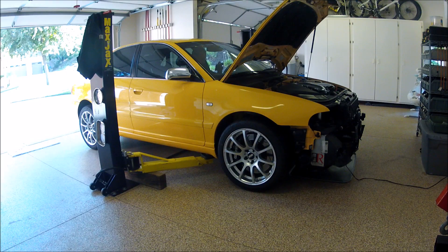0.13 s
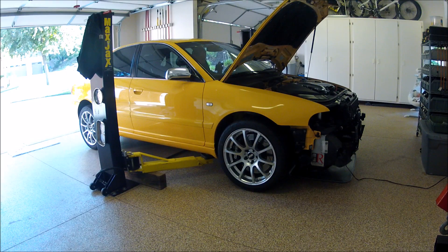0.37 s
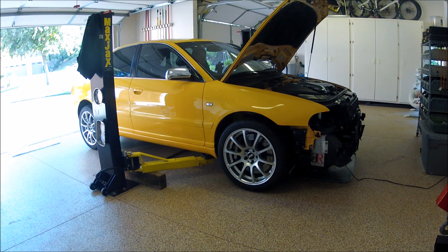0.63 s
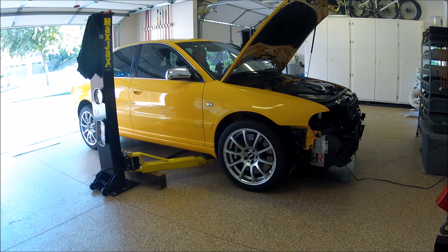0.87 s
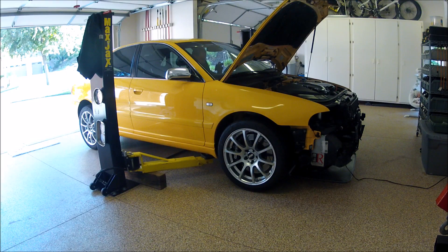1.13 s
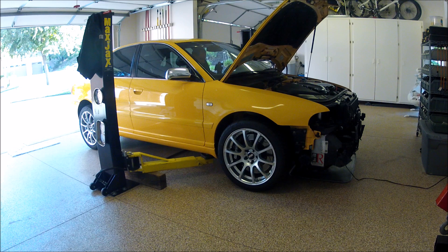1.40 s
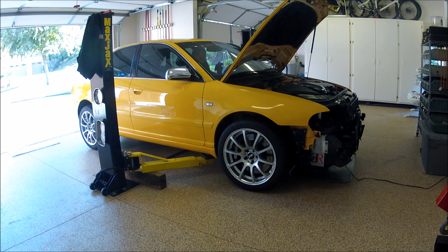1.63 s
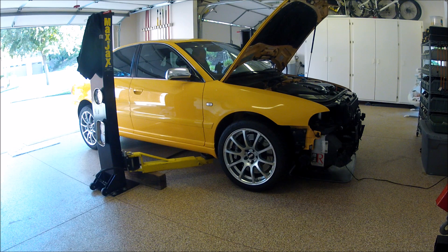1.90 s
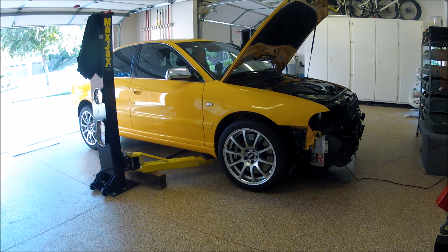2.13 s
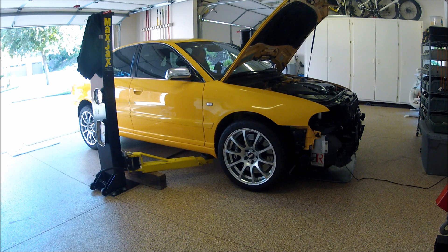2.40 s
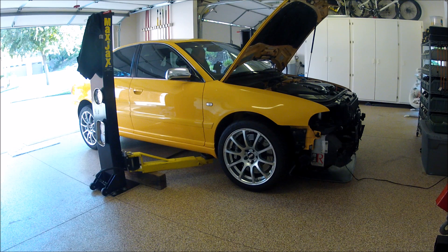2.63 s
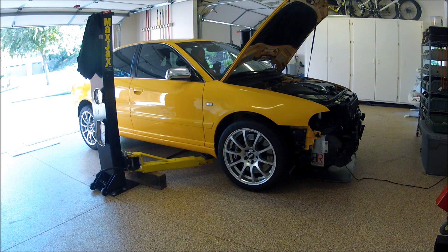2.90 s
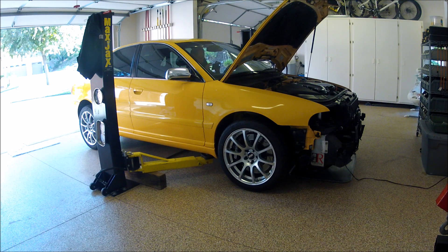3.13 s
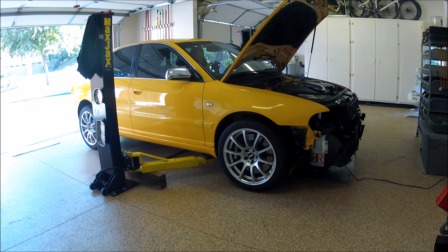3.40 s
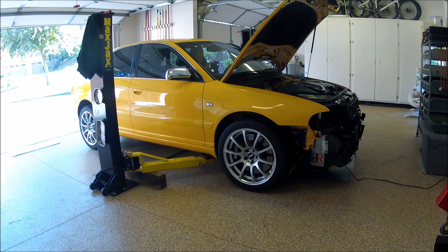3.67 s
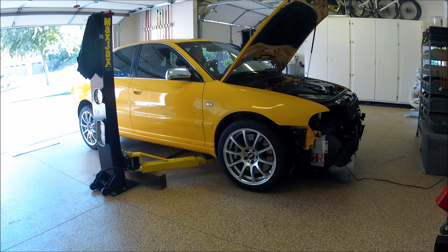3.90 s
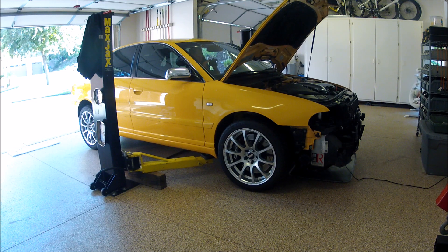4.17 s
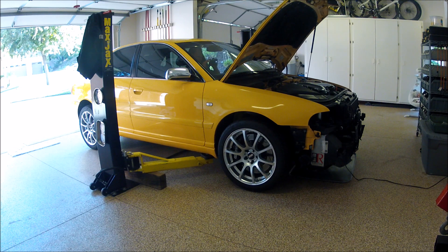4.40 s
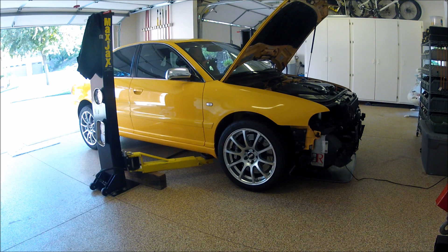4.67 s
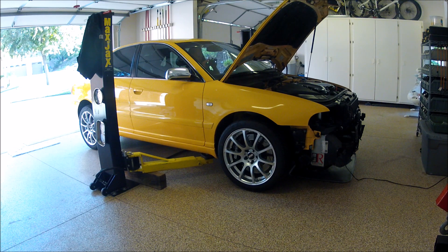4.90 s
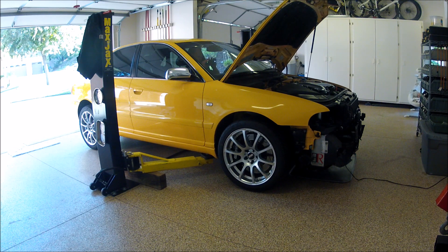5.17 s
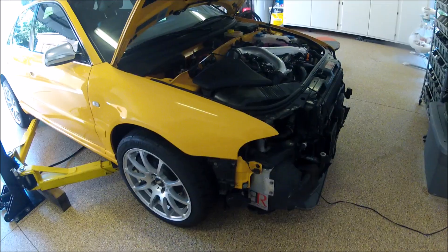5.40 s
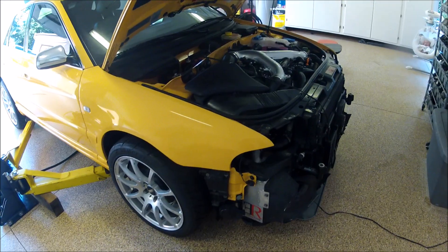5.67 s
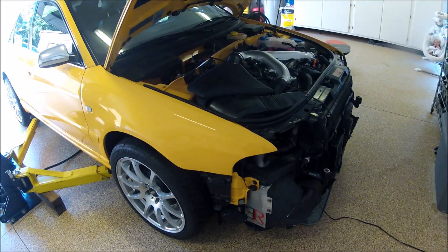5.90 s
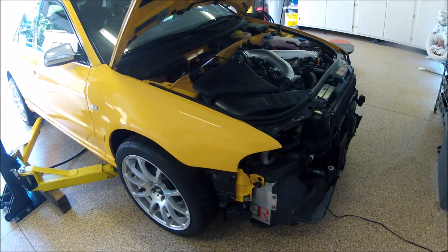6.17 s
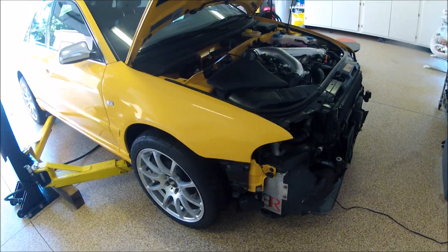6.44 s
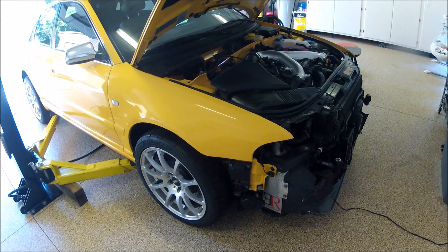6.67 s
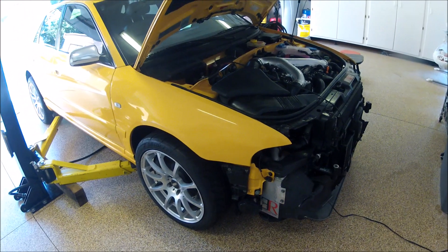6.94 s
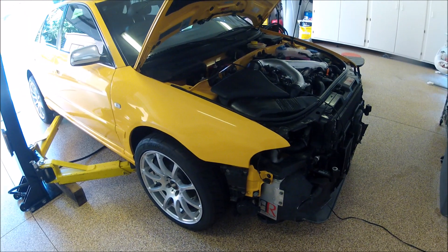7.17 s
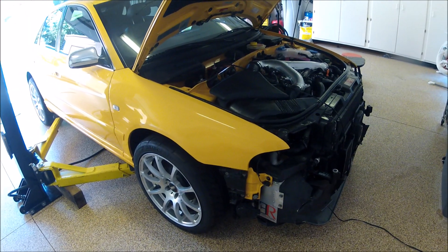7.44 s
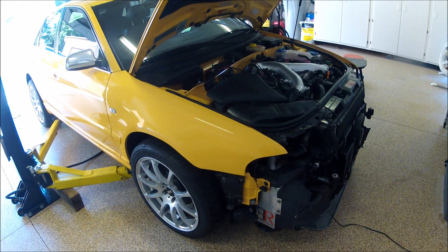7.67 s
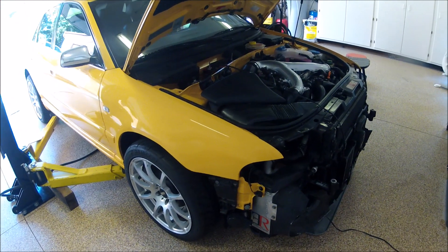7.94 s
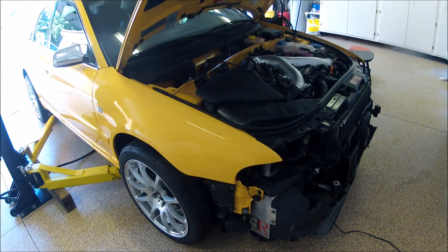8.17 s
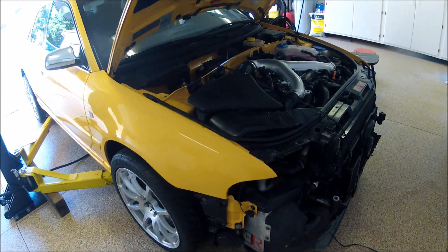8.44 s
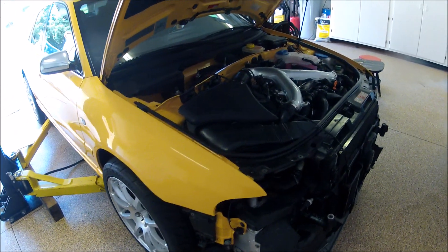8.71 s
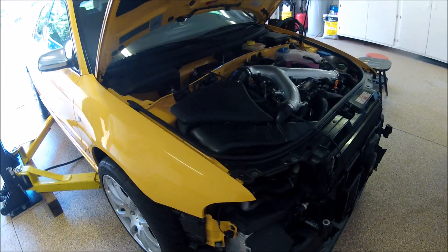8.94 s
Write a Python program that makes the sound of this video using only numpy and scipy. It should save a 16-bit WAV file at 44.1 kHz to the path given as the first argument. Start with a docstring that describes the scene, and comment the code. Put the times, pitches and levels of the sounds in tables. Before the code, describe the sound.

In a garage, a starter motor whines and grinds in heaves for half a second. The six-cylinder engine catches with uneven low pops, races with a droning, booming exhaust, then sinks to a steady fast idle. At about five and a half seconds the sound cuts hard to a close microphone by the open engine bay: a slower lumpy idle with valve ticking and airy mechanical rush.

```python
"""A six-cylinder car engine in a garage catches, races at a cold fast idle and sinks back; a starter cranks it.
At CUT_S the microphone jumps to the open engine bay, where the warm engine lopes at a slow idle.
Exhaust puffs ring pipe modes, knocks ring the block, shaped noise makes the rush and the valve ticks.
The starter is noisy gear teeth through moving resonances; faint whistles and hums stand by the bay."""
import sys
import numpy as np
from scipy import signal
from scipy.fft import rfft, irfft
from scipy.io import wavfile
from scipy.ndimage import uniform_filter1d

SR = 44100
rng = np.random.default_rng(int(sys.argv[2]) if len(sys.argv) > 2 else 0)


def unload_wav(signal):
    """Save mono or channel-first audio to the path in sys.argv[1] as 16-bit WAV at rate SR, clipped to [-1, 1]."""
    wavfile.write(
        sys.argv[1],
        SR,
        np.round(np.clip(np.atleast_2d(signal).T, -1, 1) * 32767).astype(np.int16),
    )


def ratio_of_db(decibels):
    """Turn decibels (scalar or array-like) into linear amplitude factors; 0 dB maps to 1."""
    return 10 ** (np.asarray(decibels, float) / 20)


N = 399987
T = np.arange(N) / SR  # time in s
CUT_S, SPLICE_S = 5.4435, .0002  # the jump to the bay and the length of its crossfade

# Firing rate while catching and racing: time_s, rate_firings_per_s
RACING_RATE = [(.53, 32), (.6, 48), (.7, 68), (.8, 74), (.9, 66), (1, 68), (1.1, 76.7), (1.25, 78.69),
               (1.55, 78.22), (1.7, 76), (1.85, 78.62), (2, 76.67), (2.15, 73.74)]
# Exhaust level of the cold engine: time_s, level_db
COLD_EXHAUST = [(.53, -33), (.6, -13), (1.05, -13.5), (1.6, -11), (1.95, -11.5), (2.14, -7), (2.6, -12),
                (3.5, -16.5), (5.44, -17)]
# Way from the racing to the settled firing pattern: time_s, share_0_to_1
SETTLING = [(2.0, 0.097), (2.6, 0.56), (3.6, 0.84)]
# Weak burns while the engine catches: time_s, half_length_s, exhaust_change_db
MISFIRES = [(0.68, 0.034, -6), (0.83, 0.017, -6), (0.905, 0.014, -1), (0.973, 0.033, -8.5),
            (1.196, .04, -2)]
# Throttle movement: time_s, opening_0_to_1
THROTTLE = [(.53, 0.54), (.78, 0.65), (.9, 0.86), (1.05, 0.59), (1.25, 0.97), (1.95, 0.94), (2.35, 0.37),
            (3, 0)]
# Firing patterns, one row a cylinder in firing order: puff_db, lateness_firing_gaps
RACING_PUFFS = [(2, 0.19), (2, .16), (-4, 0.22), (2.5, 0.14), (-1.5, 0.17), (2, 0.15)]
SETTLED_PUFFS = [(0.7, 0.348), (-0.5, 0.414), (1.7, 0.356), (-2, 0.5), (5, 0.395), (-0.1, 0.379)]
LOPING_PUFFS = [(1.199, -0.01), (3.702, -0.059), (6.0, -0.041), (5.998, -0.037), (3.3, -0.015),
                (5.5, -0.018)]
# Exhaust pipe modes: pitch_hz, width_hz, odd_bank_signed_share, even_bank_signed_share
PIPE_FAR = [(63.2, 6.1, 0.36, 0.23), (126.6, 7.24, -1.32, -1.015), (177.8, 39.6, 0.64, 0.55),
            (200.4, 14.5, -0.58, -0.8), (233, 4.9, 0.14, 0.31), (308, 22, -0.033, -0.043),
            (391.8, 8.9, 0.022, 0.066), (461, 35, -0.03, -0.0038), (628, 52, 0.0098, -0.0012)]
PIPE_NEAR = [(57, 46, -0.031, -0.0011), (140.4, 17.3, 0.85, 0.92), (146.7, 41.8, -0.645, -0.775),
             (160.8, 77.7, 0.226, 0.303), (207.2, 24, -0.09, -0.152), (242.8, 10.2, -0.031, -0.11),
             (286.3, 6.2, 0.011, -0.021), (368.3, 12, -0.0184, -.012), (437, 15, 0.0065, .002)]
# Single heavy firings at the catch: start_s, size_db (before the swell), pitch_hz
POPS = [(.535, -3.5, 138), (.552, 2.5, 135), (0.609, 2, 155), (0.644, 4.5, 149), (0.691, -7, 145),
        (0.847, -1.5, 143), (0.924, -0.5, 149), (1.004, 1, 146.3), (1.249, -8, 161), (1.304, -5, 152)]
# Spectra of the belt, fan and intake rush: frequency_hz, relative_level_db (per Hz)
RUSH_RACING = [(260, -31), (440, -8.5), (566, -4), (1180, -13), (1660, -13), (5830, -25), (6660, -25),
               (13100, -43), (13900, -47), (15000, -96.5)]
RUSH_SETTLED = [(260, -39.5), (440, -8), (675, -3), (794, -18), (894, -10), (5920, -25), (6960, -27.5),
                (12000, -41.5), (12800, -38.5), (14100, -79), (15000, -80)]
RUSH_NEAR = [(270, -35), (460, -5), (653, -2), (836, -10), (1000, -2.5), (1370, -8), (2400, -9),
             (3500, -12.5), (4400, -16), (5730, -20.5), (7340, -22.5), (13500, -38.5), (14400, -44),
             (15000, -65)]
# Spectrum of the starter's grind: frequency_hz, relative_level_db (per Hz)
GRIND = [(53, -52), (90, -17.5), (532, -23.5), (567, -13), (733, -24), (1170, -16.5), (1840, -21.5),
         (2710, -21.5), (6650, -29), (13500, -53), (15000, -68)]
# Left-right likeness of the noise: frequency_hz, shared_power_0_to_1
SAME = [(300, .97), (630, .88), (1380, .62), (3030, .15), (6640, .03), (14600, .1)]
# Channel balance at either spot: frequency_hz, left_minus_right_db
LEFT_FAR = [(60, 0.31), (370, 0.0), (2330, 0.34), (14600, 1.4)]
LEFT_NEAR = [(60, 1.8), (370, 1.1), (2330, 2.5), (14600, 2.3)]
# Block and panels shaken by the valve gear: pitch_hz, width_hz, relative_level_db
BLOCK_FAR = [(230, 42, -1.5), (296.6, 36, -1), (339, 31, 1.5), (384.7, 22.6, -3), (446.4, 25, -13.5),
             (581, 80, -7.5), (681, 95, -9.5)]
BLOCK_NEAR = [(265, 47, 1), (349, 13, -3), (370.5, 27, -4), (436.4, 20, -5.5), (657, 50, -13)]
# Modes of a sheet cover: pitch_hz, width_hz, relative_level_db
COVER = [(916, 29, -4.5), (1190, 21, 2.5), (1250, 21, -7.5), (4480, 60, -13)]
# Compressions against the starter: time_s, body_shake_db, whine_dip_db
SQUEEZES = [(.045, -36, 0), (.218, -39, -11), (.36, -38, -5), (.505, -52, -5.5)]
# The motor pulls through after each compression: time_s, whine_drive_db
HEAVES = [(.09, -38.5), (.295, -36.5), (.445, -38.5), (.535, -43)]
# Groans of the starter housing: time_s, half_length_s, level_db, pitch_hz
GROANS = [(0.168, .04, -42, 255), (0.287, .025, -42, 310), (0.45, .025, -47, 317)]
# Clean orders under load: multiple_of_firing_rate, level_db (before the throttle sets the load)
GROWL = [(4, -41), (5, -35), (8, -41.5)]
# Faint steady whistles by the bay: pitch_hz, level_db
THIN_TONES = [(11972, -75), (13124, -80), (13517, -81)]
# Steady hums by the bay: pitch_hz, level_db
HUMS = [(441.4, -48.5), (909.8, -55)]

COLD_RATE, SINK_S = 63.537, .553  # cold idle in firings per s, time constant of the sink to it
WARM_RATE = 41.498  # warm idle, firings per s
HUNT_RATE, HUNT_S, HUNT_TOP_S = .236, 1.198, 6.607  # idle hunting: swing in firings per s, period, a crest
DROOP_S, DROOP_RATE = 8.596, 2.238  # from here the idle droops, firings per s per s
SHUT_DB, OPEN_DB = -45.5, -36.5  # machinery gain across the garage, throttle shut and open
WARM_EXHAUST_DB, WARM_RUSH_DB = -17, -40  # exhaust level and machinery gain by the bay
# Burn scatter (0-1) at the catch, later when cold, when warm; time constant of its dying away
SCATTER_FIRST, SCATTER_COLD, SCATTER_WARM, STEADY_S = .15, .02, .035, .6
LURCH_DB, LURCH_RISE_S, LURCH_HOLD_S, LURCH_DB_PER_S = -23.5, 0.017, 0.14, -180  # block rocking
GROWL_DB_PER_OPENING = 20.5  # the growl rises by this from shut to open throttle
CATCH_S, RELEASE_S = .53, 0.676  # the engine fires; the starter lets go
SHAKE_S, DIP_S, HEAVE_S = 0.026, 0.02, 0.026  # half lengths of body shake, whine dip, heave
SHAKE_FLOOR_DB = -53  # body shake between compressions
WHINE_DB, WHINE_OVERRUN_DB = -36, -29  # whine drive between heaves, change once the engine fires
WHINE_FIRST_HZ, WHINE_TOP_HZ, SPIN_UP_S = 1035, 1244, 0.16  # whine pitch and its rise time constant
SAG_HZ = 90  # pitch sag per 10 dB of whine dip
GRIND_DB, GRIND_DB_PER_S = -42.5, 4  # clatter gain at the start, its rise until the catch
HISS_START_S, HISS_DB, HISS_HZ = 0.4, -44.5, 5700  # a bright hiss rises as the engine takes over


def evened(x):
    """Levels a signal to rms 1."""
    return x / np.sqrt(np.mean(x ** 2) + 1e-20)


def read(points, hz):
    """Reads a curve on a log-frequency axis."""
    f, value = np.transpose(points)
    return np.interp(np.log(hz + 1), np.log(f + 1), value)


def curves(rows):
    """Draws every column of a timed table at the sample rate."""
    s, *columns = np.transpose(rows)
    return [np.interp(T, s, c) for c in columns]


def bump(s, half_s):
    """A bell in time, down to 1/e at half_s from its centre."""
    return np.exp(-((T - s) / half_s) ** 2)


def ring(hz, width, size=SR // 3):
    """One dying mode: a wider resonance starts louder and dies sooner."""
    t = T[:size]
    return width * np.exp(-np.pi * width * t) * np.sin(2 * np.pi * hz * t)


def struck(hits, body):
    """Lets every hit set off the body's ring."""
    return signal.oaconvolve(hits, body)[:N]


def resonate(x, hz, width):
    """A moving resonance: shift the curve hz to zero, smooth twice, shift back."""
    turn = np.exp(2j * np.pi * np.cumsum(hz) / SR)
    r = np.exp(-np.pi * width / SR)
    smooth = signal.lfilter([1], np.convolve([1, -r], [1, -r]), x / turn)
    return evened((turn * smooth).real)


def noise(first, second, share, patchy_db):
    """Patchy two-channel noise sliding between two spectra, each scaled by its 1.5 to 8 kHz power."""
    frames, hz = N // 128 + 5, np.fft.rfftfreq(512, 1 / SR)
    a, b, c, d, patches = rng.standard_normal((frames, 257, 5)).T
    patches = evened(uniform_filter1d(uniform_filter1d(patches, 6, 0), 14, 1))
    same = np.clip(read(SAME, hz), 0, 1)[:, None] ** .5
    left, other = a + 1j * b, c + 1j * d
    z = np.array([left, same * left + np.sqrt(1 - same ** 2) * other])
    band = (hz > 1500) & (hz < 8000)
    shapes = [ratio_of_db(read(p, hz)) / np.linalg.norm(ratio_of_db(read(p, hz[band]))) for p in (first, second)]
    share = np.clip(np.interp(np.arange(frames) * 128, np.arange(N), share), 0, 1)
    z *= (np.outer(shapes[0], 1 - share) + np.outer(shapes[1], share)) * ratio_of_db(patchy_db * patches)
    return signal.istft(z, nperseg=512, noverlap=384)[1][:, :N] * np.sqrt(2)


def balance(x, points):
    """Tilts the channels against each other; the left one hears the sound 2.97 samples later."""
    hz = np.fft.rfftfreq(N, 1 / SR)
    tilt = ratio_of_db(read(points, hz) / 2) * np.exp(-1j * np.pi * hz * 2.97 / SR)
    return irfft(rfft(x) * [tilt, 1 / tilt], N)


def tones(lines, width):
    """Narrow whistles or hums: noise through tight resonances, so their strength wavers."""
    return sum(ratio_of_db(db) * resonate(rng.standard_normal(N), hz + 0 * T, width) for hz, db in lines)


def body_shake():
    """Each compression rocks the car body, a low 34 Hz rumble, until the engine fires."""
    rumble = evened(struck(rng.standard_normal(N), ring(34, 25))) * (T < CATCH_S)
    return rumble * (ratio_of_db(SHAKE_FLOOR_DB) + sum(ratio_of_db(db) * bump(s, SHAKE_S) for s, db, _ in SQUEEZES))


def housing_groan():
    """The starter housing groans in short swelling sines."""
    return sum(ratio_of_db(db) * bump(s, half_s) * np.sqrt(2) * np.sin(2 * np.pi * hz * T)
               for s, half_s, db, hz in GROANS)


def starter():
    """Gear teeth whine with the heaving motor speed, which sags at each compression."""
    sag = sum(db * bump(s, DIP_S) for s, _, db in SQUEEZES)
    whine_hz = WHINE_TOP_HZ - (WHINE_TOP_HZ - WHINE_FIRST_HZ) * np.exp(-T / SPIN_UP_S)
    whine_hz = whine_hz + SAG_HZ * sag / 10
    pull = ratio_of_db(WHINE_DB) + sum(ratio_of_db(db) * bump(s, HEAVE_S) for s, db in HEAVES)
    pull = pull * ratio_of_db(sag + WHINE_OVERRUN_DB * np.clip((T - CATCH_S) / .04, 0, 1))
    teeth = rng.standard_normal(N) * (rng.random(N) < .08)  # sparse random clicks
    whine = 0.7 * resonate(teeth, whine_hz, 350) + .5 * resonate(teeth, whine_hz, 58)
    whine = whine + 0.36 * resonate(teeth, 950 + 0 * T, 82)
    clatter = 1.05 * resonate(teeth, 2.4 * whine_hz, 820) + 1.07 * noise(GRIND, GRIND, T, 1.8)
    clatter = clatter * ratio_of_db(GRIND_DB + GRIND_DB_PER_S * np.minimum(T, CATCH_S) + 0.21 * sag)
    air = noise([(900, -30), (HISS_HZ, 0), (13500, -22), (15000, -50)], GRIND, 0 * T, 1.3)
    hiss = ratio_of_db(HISS_DB) * np.clip((T - HISS_START_S) / .07, 0, 1) * air
    release = np.clip((RELEASE_S - T) / 0.029, 0, 1)
    return (pull * whine + clatter + housing_groan() + body_shake() + hiss) * release


def firings(rate, zero_s):
    """Running count of firing gaps, zero where the first cylinder of the order fires."""
    turns = np.cumsum(rate) / SR
    return turns - turns[round(zero_s * SR)]


def beat(turns, offset, decay, count):
    """A sharp rise and decay once in `count` firing gaps; offset and decay are in gaps."""
    return np.exp(-((turns - offset) % count) / decay)


def rattle(turns, modes, drift):
    """The same uneven knocks return every engine cycle, changing a little, and ring the block."""
    k = np.arange(np.ceil(4 * turns[0]), 4 * turns[-1]).astype(int)  # four knocks a firing gap
    size = rng.standard_normal(24)[k % 24] + drift * rng.standard_normal(len(k))
    knocks = np.zeros(N)
    knocks[np.interp(k / 4, turns, np.arange(N)).astype(int)] = size
    body = sum((-1) ** i * ratio_of_db(db) * ring(hz, w) for i, (hz, w, db) in enumerate(modes))
    return evened(struck(knocks, body))


def growl(turns):
    """Upper orders of the firing rate stand clear while the throttle is open."""
    load = ratio_of_db(GROWL_DB_PER_OPENING * (np.clip(curves(THROTTLE)[0], 0, 1) - 1.5)) * (T > CATCH_S)
    orders = sum(ratio_of_db(db) * np.sqrt(2) * np.sin(2 * np.pi * np.round(order) * turns) for order, db in GROWL)
    return load * orders


def block_rocking(turns, since):
    """The block rocks once a firing just after the catch, then dies away fast."""
    level_db = LURCH_DB + LURCH_DB_PER_S * np.maximum(since - LURCH_HOLD_S, 0)
    return np.minimum(since / LURCH_RISE_S, 1) * ratio_of_db(level_db) * np.sin(2 * np.pi * turns)


def pops():
    """Rich first charges swell into the pipe with a 7.5 ms time constant and ring it."""
    out = np.zeros(N)
    swell = 1 - np.exp(-T[:SR // 3] / 0.0075)
    for s, db, hz in POPS:
        bang = (ring(hz, 14.6) / 22 + 0.12 * ring(2.75 * hz, 60) / 60) * swell
        out[round(s * SR):][:len(bang)] += ratio_of_db(db) * bang
    return out


def exhaust(turns, before, after, share, scatter, pipe, start_s):
    """One puff a firing, sized and timed by its cylinder, rings the pipe of its bank."""
    k = np.arange(np.ceil(turns[round(start_s * SR)]), turns[-1]).astype(int)
    at = np.interp(k, turns, np.arange(N)).astype(int)
    mix = share[at, None]
    puff_db, late = (np.array(before)[k % 6] * (1 - mix) + np.array(after)[k % 6] * mix).T
    chance = rng.standard_normal((len(k), 2)) * scatter[at, None]  # burns vary in time and size
    at = np.interp(k + late + 0.11 * chance[:, 0], turns, np.arange(N)).astype(int)
    size = ratio_of_db(puff_db + 22 * chance[:, 1])
    out = np.zeros(N)
    for bank in (0, 1):
        mine = k % 2 == bank
        puffs = np.zeros(N)
        np.add.at(puffs, at[mine], size[mine])
        out += struck(puffs, sum(row[2 + bank] * ring(*row[:2]) for row in pipe))
    return out


def far_engine():
    """The cold engine across the garage: exhaust, pops, growl, rocking block and machinery rush."""
    last_s, last_rate = RACING_RATE[-1]
    sink = 1 - np.exp(-np.maximum(T - last_s, 0) / SINK_S)
    rate = curves(RACING_RATE)[0] - (last_rate - COLD_RATE) * sink
    turns, share = firings(rate, 1.1), curves(SETTLING)[0]
    since = np.maximum(T - CATCH_S, 0)

    exhaust_db = curves(COLD_EXHAUST)[0] + sum(db * bump(s, half_s) for s, half_s, db in MISFIRES)
    scatter = SCATTER_COLD + (SCATTER_FIRST - SCATTER_COLD) * np.exp(-since / STEADY_S)
    pipe = exhaust(turns, RACING_PUFFS, SETTLED_PUFFS, share, scatter, PIPE_FAR, .535)
    pipe = evened(pipe[:round(CUT_S * SR)])  # levelled over the part heard
    pipe = np.pad(pipe, (0, N - len(pipe)))

    rush_db = SHUT_DB + (OPEN_DB - SHUT_DB) * curves(THROTTLE)[0]
    rush = noise(RUSH_RACING, RUSH_SETTLED, share, 0.68)
    rush = rush * (0.91 + 0.33 * beat(turns, 0.95, 0.34, count=2))
    rush = rush + (2.35 + 0.97 * share) * rattle(turns, BLOCK_FAR, drift=0.39)
    machinery = ratio_of_db(rush_db) * rush * np.minimum(since / 0.064, 1)
    return ratio_of_db(exhaust_db) * pipe + pops() + growl(turns) + block_rocking(turns, since) + machinery


def near_engine():
    """The warm engine by the bay: valves tick three times a cycle and once more; a cover rings once a cycle."""
    hunting = HUNT_RATE * np.cos(2 * np.pi * (T - HUNT_TOP_S) / HUNT_S)
    rate = WARM_RATE + hunting - DROOP_RATE * np.maximum(T - DROOP_S, 0)
    turns = firings(rate, CUT_S)
    pipe = evened(exhaust(turns, LOPING_PUFFS, LOPING_PUFFS, 0 * T, SCATTER_WARM + 0 * T, PIPE_NEAR, 0))

    rush = noise(RUSH_NEAR, RUSH_NEAR, T, 1.16)
    bright = signal.lfilter(*signal.butter(2, 2200, "high", fs=SR), rush)
    metal = (ring(3140, 130) + ring(4160, 150))[None]
    clatter = evened(signal.oaconvolve(rush, metal, axes=1)[:, :N])
    ticks = (0.8 * bright + 0.16 * clatter) * beat(turns, 1.85, 0.59, count=2)
    ticks = ticks + (0.38 * bright + 0.36 * clatter) * beat(turns, 6.7, 0.54, count=6)

    sheet = sum(ratio_of_db(db) * ring(hz, w) for hz, w, db in COVER)
    cover = evened(struck(rng.standard_normal(N), sheet))
    cover = cover * (0.44 + beat(turns, 1.3, 1.0, count=6))  # never quite silent between
    block = 1.73 * rattle(turns, BLOCK_NEAR, drift=0.36)
    machinery = 0.88 * rush + ticks + 0.96 * cover + block
    return ratio_of_db(WARM_EXHAUST_DB) * pipe + ratio_of_db(WARM_RUSH_DB) * machinery


def scene():
    """Two microphone spots joined by a hard cut."""
    near = np.clip((T - CUT_S) / SPLICE_S, 0, 1)
    garage = balance(starter() + far_engine(), LEFT_FAR)
    bay = balance(near_engine() + tones(THIN_TONES, 9) + tones(HUMS, 5), LEFT_NEAR)
    return (1 - near) * garage + near * bay


def band_limit(x):
    """A steep low-pass at the top of the band."""
    return signal.sosfilt(signal.butter(12, 15150, fs=SR, output="sos"), x)


def record(dry):
    """The microphone drops the deepest bass, below 15 Hz."""
    mix = signal.lfilter(*signal.butter(1, 15, "high", fs=SR), dry)
    return band_limit(mix)


dry = scene()
out = record(dry)
unload_wav(out)
```